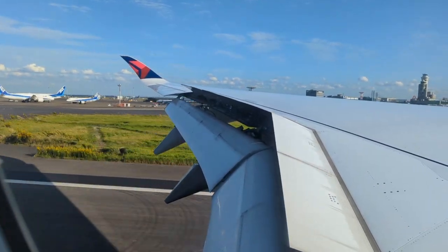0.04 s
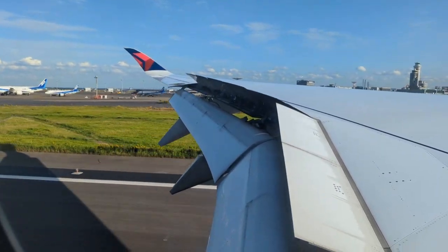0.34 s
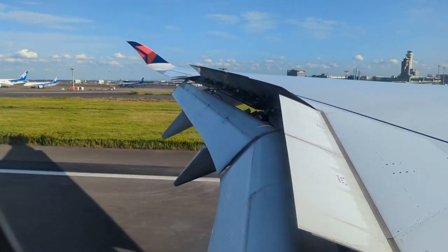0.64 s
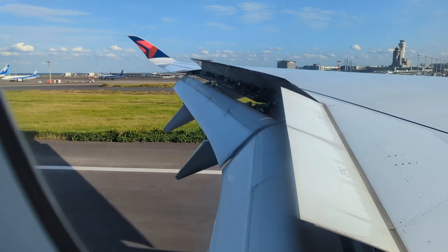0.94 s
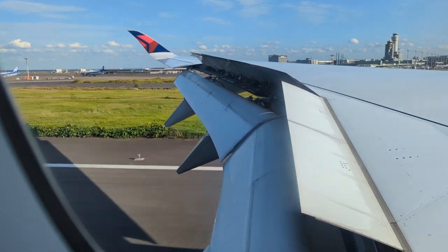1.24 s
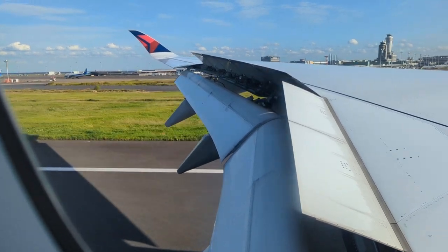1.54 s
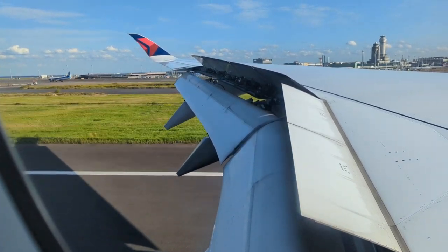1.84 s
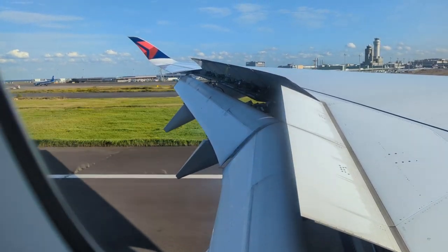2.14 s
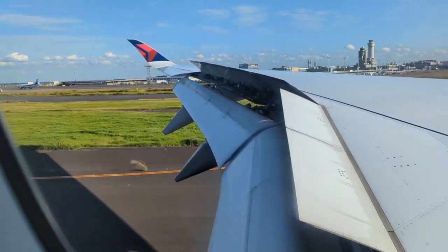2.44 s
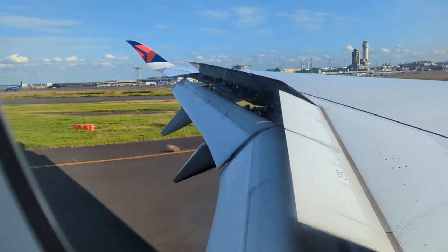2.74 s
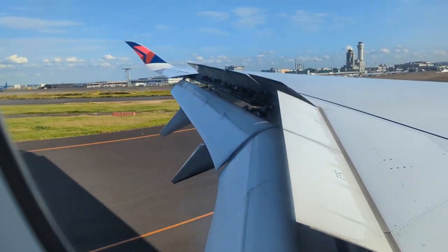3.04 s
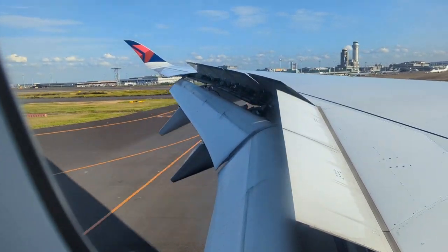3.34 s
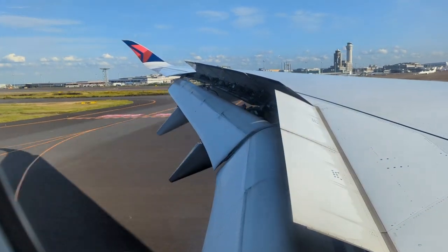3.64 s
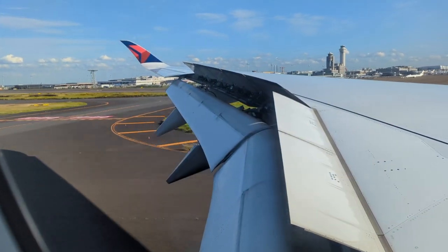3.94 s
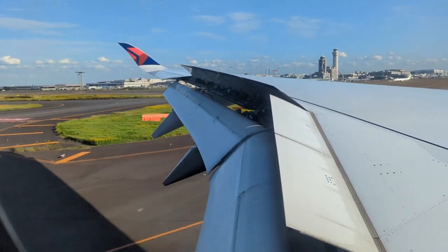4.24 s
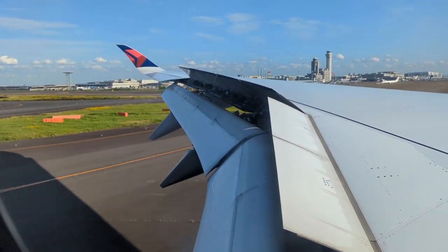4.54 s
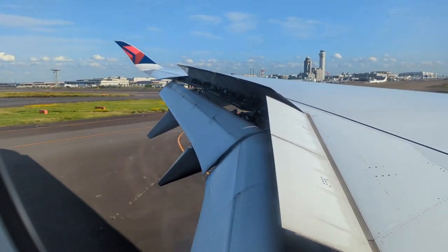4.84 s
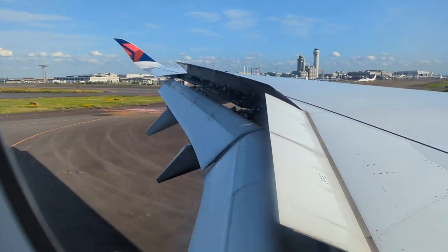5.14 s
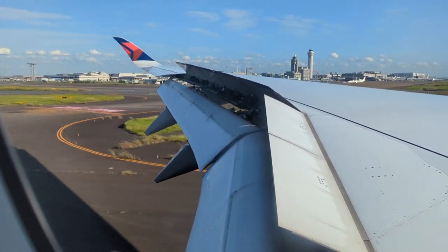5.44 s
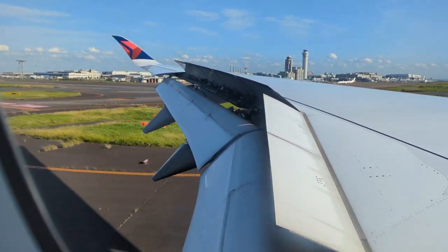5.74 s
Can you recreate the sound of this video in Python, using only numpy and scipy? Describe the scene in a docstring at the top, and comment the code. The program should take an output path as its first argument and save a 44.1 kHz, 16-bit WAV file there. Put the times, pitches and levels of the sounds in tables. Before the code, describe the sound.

An airliner rolls along after landing, heard inside the cabin as a loud, deep rumble and roar with rattling, knocking panels.

```python
"""Inside an airliner rolling out on a runway after landing, at a window over the wing.
From the start the wheels send a deep, surging rumble through the airframe, engines and air roar, and
the shaking rattles panels and ticks plastic fittings. From half a second on, pavement jolts bring
flurries, loose panels knock and rubbing plastic squeaks. The knocks crowd in past the middle, and the
roar swells to the end. Two microphone ports colour it all differently; a limiter holds the peaks."""
import sys
import numpy as np
from scipy import signal
from scipy.fft import rfft, irfft
from scipy.io import wavfile
from scipy.ndimage import uniform_filter1d, minimum_filter1d

SR = 44100
rng = np.random.default_rng(int(sys.argv[2]) if len(sys.argv) > 2 else 0)


def wav_record(signal):
    """Record a signal, one row per channel, as 16-bit PCM in the file named by sys.argv[1]."""
    frames = np.transpose(np.atleast_2d(signal))
    bounded = np.clip(frames, -1, 1)
    # unit amplitude maps onto the largest positive 16-bit level
    quanta = np.round(bounded * 32767).astype(np.int16)
    wavfile.write(sys.argv[1], SR, quanta)


N = 259308
TIME = np.arange(N) / SR
BINS = np.fft.rfftfreq(N, 1 / SR)


def amp(db):
    """Decibels to amplitude ratio."""
    return 10 ** (np.asarray(db) / 20)


def unit(x):
    """Normalisation to rms 1; a stereo pair by the mean of its channels."""
    return x / np.sqrt(np.mean(np.atleast_2d(x).mean(0) ** 2) + 1e-20)


def across(points, hz):
    """Interpolation of a table on a log-frequency axis."""
    f, value = np.transpose(points)
    return np.interp(np.log(hz + 1), np.log(f + 1), value)


def level(curve, column=1):
    """Amplitude envelope from one dB column; table levels are relative, ahead of the mixing gains."""
    rows = np.array(curve)
    return amp(np.interp(TIME, rows[:, 0], rows[:, column]))


def coloured(x, spectrum):
    """Spectral shaping, falling 12 dB per octave below the first point."""
    skirt = np.minimum(BINS / spectrum[0][0], 1) ** 2
    return irfft(rfft(x) * amp(across(spectrum, BINS)) * skirt, N)


def steadied(x, span_s):
    """Division by the running rms evens out slow changes and leaves the quick flutter."""
    window = signal.windows.hann(int(span_s * SR) + 3)
    weight = signal.fftconvolve(np.ones(N), window, "same")
    power = signal.fftconvolve((x ** 2).mean(0), window, "same") / weight
    return unit(x / np.sqrt(abs(power) + 1e-20))


def wander(low_hz, high_hz):
    """Band-limited pink noise: slow random motion between two rates."""
    shape = (BINS > low_hz) / np.sqrt(BINS + low_hz) / (1 + (BINS / high_hz) ** 2)
    return unit(irfft(rfft(rng.standard_normal(N)) * shape, N))


def add(mix, start_s, sound):
    """Superposition of a sound on the mix."""
    part = mix[:, max(round(start_s * SR), 0):][:, :sound.shape[1]]
    part += sound[:, :part.shape[1]]


# likeness of the cabin sound at the two ports: frequency_hz, correlation
COHERENCE = [(60, 0.99), (150, 0.99), (270, 0.97), (400, 0.88), (500, 0.71), (620, 0.44), (850, 0.16),
             (1200, -0.47), (1600, -0.34), (2100, -0.037)]
def cabin_noise(spectrum):
    """Diffuse-field coherence: two ports hear alike in the bass, unrelated in the treble."""
    left, independent = rfft(rng.standard_normal((2, N)))
    alike = np.clip(across(COHERENCE, BINS), -1, 1)
    right = alike * left + np.sqrt(1 - alike ** 2) * independent
    return coloured(irfft(np.array([left, right]), N), spectrum)


# spectra of the fuselage's throb and the floor's drumming: frequency_hz, level_db
THROB_SPECTRUM = [(15, -16), (25, -10), (34, -18.5), (44, -13.5), (56, -2.5), (68, 0.5), (78, -6.5),
                  (90, -23.5), (130, -33.5), (300, -96.5)]
DRUM_SPECTRUM = [(55, -49), (72, -18), (84, 0.5), (100, 0.5), (114, -0.5), (130, -7), (160, -14.5),
                 (300, -54), (1000, -78)]
# surges of the throb over uneven pavement: centre_s, length_s, lift_db
SURGES = [(0.097, 0.029, 5), (0.677, 0.15, 7.5), (0.99, 0.086, 8), (1.134, 0.032, 8.5), (1.666, 0.072, 5),
          (2.256, 0.047, 6.5), (2.664, 0.089, 4), (2.838, 0.096, 9), (3.175, .08, 6.5), (3.543, 0.16, 2.5),
          (4.03, 0.3, 4), (4.622, 0.17, 8), (4.99, .16, 3.5), (5.27, 0.086, 10), (5.587, 0.078, 5),
          (5.838, .1, 4)]
# drumming of the cabin floor: time_s, level_db
DRUM_LEVELS = [(0, -14.5), (1.15, -15.5), (1.43, -10.5), (1.65, -15), (2.4, -12.5), (3.1, -13.5),
               (3.4, -9.5), (3.8, -15), (4.3, -10.5), (4.85, -9.5), (5.45, -15), (5.88, -11)]
def wheels():
    """Structure-borne sound: rough pavement drives the lowest fuselage resonances and the floor."""
    surge_db = sum(db * np.exp(-2 * ((TIME - s) / length_s) ** 2) for s, length_s, db in SURGES)
    throb = amp(-15 + surge_db) * steadied(cabin_noise(THROB_SPECTRUM), span_s=0.34)
    drum = level(DRUM_LEVELS) * steadied(cabin_noise(DRUM_SPECTRUM), span_s=0.47)
    return throb + amp(-0.5) * drum


# spectra of the roar's two bands: frequency_hz, level_db
BOOM_SPECTRUM = [(80, -74), (125, -1.5), (145, 2.5), (185, -3), (215, -4), (238, -2), (262, -4.5),
                 (285, -17), (340, -14.5), (430, -33.5), (700, -64)]
RUSH_SPECTRUM = [(200, -30), (285, 4), (335, 2.5), (385, 1.5), (455, -3.5), (505, -2.5), (560, -7),
                 (800, -9.5), (1000, -13), (1250, -18), (2200, -23), (3600, -35.5), (4300, -34),
                 (5000, -44), (12000, -76)]
# swell of engines and air: time_s, boom_db, rush_db
ROAR_LEVELS = [(0, -19, -30), (1.6, -19.5, -30.5), (3.0, -16.5, -26), (3.7, -20, -27.5), (4.3, -14.5, -27),
               (4.6, -15.5, -24), (5.1, -11.5, -23.5), (5.88, -11, -24.5)]
def roar():
    """Transmission through the cabin wall: engines and air arrive as a boom and a gusty rush above it."""
    boom = steadied(cabin_noise(BOOM_SPECTRUM), span_s=0.23)
    gusts = amp(0.87 * wander(1.6, 33))
    rush = steadied(cabin_noise(RUSH_SPECTRUM) * gusts, span_s=0.3)
    return amp(-0.1) * level(ROAR_LEVELS, 1) * boom + amp(2.5) * level(ROAR_LEVELS, 2) * rush


def contact(hz, width_hz, ring_db, rise_s, decay_s, echo_db, size=4096):
    """Impact excitation: a short scrape rings one resonance, and seats and walls scatter it."""
    t, f = np.arange(size) / SR, np.fft.rfftfreq(size, 1 / SR)
    echo = amp(echo_db) * np.exp(-t / .018)
    envelope = (1 - np.exp(-t / rise_s)) ** 2 * (np.exp(-t / decay_s) + echo)
    scrape = rng.standard_normal((2, size)) * envelope
    resonance = 1 + amp(ring_db) / (1 + 2j * (f - hz) / width_hz)
    return unit(irfft(rfft(scrape) * resonance))


def rattle(shake, spectrum, band_hz, density, flutter_db, width_hz, ring_db, decay_s, parts=28):
    """A Poisson process: loose parts strike at random, more often the harder they are shaken."""
    out = np.zeros((2, N))
    chance = density / parts / SR * unit(shake) ** 0.65
    for hz in np.geomspace(*band_hz, parts):
        hits = (rng.random(N) < chance) * amp(2.5 * np.minimum(rng.exponential(1, N), 3))
        ring = contact(hz, width_hz, ring_db, rise_s=0.00035, decay_s=decay_s, echo_db=-19)
        out += signal.oaconvolve(hits[None], ring, axes=1)[:, :N]
    flutter = amp(flutter_db * wander(2.7, 45))
    return shake * flutter * steadied(coloured(out, spectrum), span_s=0.11)


# spectra of wall panels and plastic fittings: frequency_hz, level_db
PANEL_SPECTRUM = [(500, 4), (1000, 3), (1230, 0.5), (1380, -3), (1650, -1.5), (1880, -1.5), (2050, 0.5),
                  (2260, -3.5), (2400, -2), (2600, 1), (3100, -2.5), (3520, 3.5), (4150, 1), (4900, -11),
                  (6300, -13.5), (9000, -32)]
FITTING_SPECTRUM = [(2000, -0.5), (4000, 16), (5200, 2.5), (6200, 4), (6800, -2), (7400, 1), (8000, -5),
                    (8770, -0.5), (9700, -3), (11900, -2), (13800, -7), (14900, -3), (16000, -3.5)]
# steady shaking of the trim: time_s, panel_db, fitting_db
SHAKE_LEVELS = [(0, -46, -55.5), (.5, -40, -53.5), (.77, -46, -63), (1.0, -42, -57), (1.42, -45, -64.5),
                (1.55, -41, -55.5), (1.8, -43, -61.5), (2.35, -38, -56.5), (2.7, -35, -48), (3.1, -35, -50),
                (3.6, -35.5, -49.5), (3.95, -40.5, -55.5), (4.45, -35, -51.5), (4.7, -34, -50),
                (5.22, -34.5, -55), (5.4, -37, -52.5), (5.88, -34.5, -54)]
def trim(jolt_db):
    """Forced vibration: the same shaking rattles panels and, higher in pitch, small plastic fittings."""
    panel_shake = level(SHAKE_LEVELS, 1) * amp(jolt_db)
    fitting_shake = level(SHAKE_LEVELS, 2) * amp(1.16 * jolt_db)  # light parts answer a jolt more
    panels = rattle(panel_shake, PANEL_SPECTRUM, band_hz=(1113, 3950), density=1300,
                    flutter_db=1.35, width_hz=150, ring_db=7.5, decay_s=0.002)
    fittings = rattle(fitting_shake, FITTING_SPECTRUM, band_hz=(4420, 14670), density=760,
                      flutter_db=1.2, width_hz=420, ring_db=10.5, decay_s=0.0025)
    return amp(-2.16) * panels + amp(5.0) * fittings


def blows(rows, spectrum, width_hz, rise_s, base_decay_s, hardening, size=4096):
    """Contact stiffening and damping: a harder blow is brighter, a freer ring lasts longer."""
    out, f = np.zeros((2, N)), np.fft.rfftfreq(2 * size, 1 / SR)
    usual_db = np.mean([row[1] for row in rows])
    for time_s, peak_db, hz, ring_db in rows:
        decay_s = base_decay_s * 2 ** (ring_db / 29)  # doubles for a ring 29 dB stronger
        ring = contact(hz, width_hz, ring_db, rise_s, decay_s, echo_db=-22)
        tilt_db = hardening * max(peak_db - usual_db, 0) * np.log2(1 + f / hz)
        blow = irfft(rfft(ring, 2 * size) * amp(across(spectrum, f) + tilt_db))[:, :size]
        peak = np.sqrt(2 * uniform_filter1d((blow ** 2).mean(0), size=200).max())
        add(out, time_s - rise_s, amp(peak_db) * blow / peak)
    return out


# single clicks of the fittings: time_s, peak_db, pitch_hz
CLICKS = [(0.037, -32, 11100), (0.105, -32, 12000), (0.198, -28, 12500), (0.205, -24.5, 12400),
          (0.3187, -31.5, 7280), (0.539, -31, 7050), (0.6719, -28, 7510), (.835, -33, 13800),
          (1.055, -31, 7140), (1.359, -33.5, 6870), (1.461, -33.5, 7050), (1.509, -33, 6930),
          (1.6222, -34, 7210), (1.673, -35, 7090), (1.821, -32, 6860), (2.0487, -30.5, 6860),
          (2.299, -25, 8900), (2.569, -27, 6880), (2.6274, -31, 12000), (2.749, -27, 14700),
          (3.193, -22, 12000), (3.266, -26, 8990), (3.522, -36, 5800), (3.598, -31, 5800),
          (3.704, -25.5, 10700), (3.9848, -32, 6810), (4.016, -31, 11900), (4.035, -24, 11900),
          (4.103, -28, 7130), (4.203, -28.5, 7250), (4.261, -24, 9000), (4.569, -26, 7040),
          (4.874, -26.5, 14500), (5.476, -26, 9000), (5.822, -26, 8930)]
def clicks(ring_db=-0.5):
    """Impacts of hard plastic fittings excite high, quickly damped resonances."""
    rows = [(*row, ring_db) for row in CLICKS]
    return blows(rows, FITTING_SPECTRUM, width_hz=500, rise_s=0.001205, base_decay_s=.0038, hardening=0.7)


# jolts from the pavement: start_s, lift_db, hold_s
JOLTS = [(.535, 4, 0.069), (0.905, 5, .06), (1.963, 9.5, 0.0091), (2.394, 3.5, 0.018), (2.76, -1.5, .025),
         (2.923, 4.5, .05), (3.164, 6, .15), (3.243, 1, 0.11), (3.515, 5.5, .055), (4.252, 5, 0.038),
         (4.405, 3.5, 0.044), (4.652, 2, 0.07), (5.295, 4.5, 0.038)]
def jolts(attack_s=.014, release_s=.035):
    """Transient excitation: each jolt shifts the shaking, in dB, then holds and decays exponentially."""
    lift_db = np.zeros(N)
    for start_s, db, hold_s in JOLTS:
        t = TIME - start_s
        lift_db += db * np.clip(t / attack_s, 0, 1) * np.exp(-np.maximum(t - hold_s, 0) / release_s)
    return lift_db


# single knocks of loose panels: time_s, peak_db, pitch_hz, ring_db
KNOCKS = [(0.536, -27, 2620, 15), (0.6729, -26.5, 2200, 15), (1.971, -27, 1880, 22), (2.266, -23, 2000, 8),
          (2.579, -21, 2520, 3), (2.627, -18.5, 2300, 9), (2.663, -21.5, 3880, -2), (2.703, -21, 3600, 3),
          (2.773, -16, 3420, 5), (2.9088, -13, 3400, 3), (3.1882, -16, 3520, 12), (3.275, -17, 4000, 19),
          (3.5204, -19, 3350, 11), (3.5594, -18, 3700, 12), (3.597, -15, 3450, 7), (3.633, -17.5, 3580, 5),
          (3.655, -23, 3700, 2), (3.7, -21, 2100, 15), (3.731, -18, 1650, 22), (3.761, -20, 3530, 1),
          (3.7804, -17.5, 3540, 6), (4.0183, -19.5, 1650, 21), (4.108, -18, 2630, 4),
          (4.2744, -16, 1650, 24), (4.4353, -17, 3400, 9), (4.6636, -18, 3700, 7), (4.745, -17.5, 2170, 16),
          (5.3174, -21, 3620, 4), (5.428, -18.5, 1480, 9), (5.5623, -21, 1800, 13)]
def knocks():
    """Damped free vibration: a loose panel strikes and rings at its own pitch."""
    return blows(KNOCKS, PANEL_SPECTRUM, width_hz=110, rise_s=0.001158, base_decay_s=.0063, hardening=0.58)


# plastic rubbing on plastic: start_s, level_db, pitch_hz, length_s
SQUEAKS = [(0.892, -30.5, 3720, .024), (1.201, -36, 3590, 0.033), (2.403, -35, 1850, 0.028),
           (5.548, -33, 3500, .035)]
def squeaks(width_hz=140, size=4096):
    """Stick-slip friction: uneven slips keep one narrow resonance ringing in a brief swell."""
    out, t, f = np.zeros((2, N)), np.arange(size) / SR, np.fft.rfftfreq(size, 1 / SR)
    for start_s, db, hz, length_s in SQUEAKS:
        slips = irfft(rfft(rng.standard_normal((2, size))) / (1 + 1j * (f - hz) / width_hz) ** 2)
        tone = np.cos(np.angle(signal.hilbert(slips)))  # constant amplitude, wavering pitch
        swell = np.sin(np.pi * np.minimum(t / length_s, 1) ** 1.8)
        add(out, start_s, amp(db) * tone * swell)
    return out


# resonances of the trim: pitch_hz, width_hz, lift_db
TRIM_MODES = [(1860, 123, 4), (2240, 100, 5), (2690, 130, 3.5), (3530, 51, -0.5), (3710, 130, 0.5),
              (8870, 220, 3.5), (11800, 300, 0.5), (14924, 250, 1)]
def trim_resonance(x):
    """Modal superposition: everything that rattles passes through the same resonances."""
    body = 1 + sum((amp(db) - 1) / (1 + 2j * (BINS - hz) / width_hz) for hz, width_hz, db in TRIM_MODES)
    return irfft(rfft(x) * body, N)


def scene():
    """Superposition at the seat: rumble, roar and shaking trim, eased in and out over 3 ms."""
    rumble_and_roar = wheels() + roar()
    rattling = trim_resonance(trim(jolts()) + amp(-4.5) * clicks() + amp(-5.5) * knocks())
    edge_s = np.minimum(TIME, TIME[::-1])
    ease = np.sin(np.pi / 2 * np.minimum(edge_s / .003, 1)) ** 2
    return ease * (rumble_and_roar + rattling + amp(3.0) * squeaks())


# the right port rings near 4 kHz and has a null near 8 kHz: frequency_hz, left_minus_right_db
PORT_BALANCE = [(120, 1.55), (460, 2), (700, -1), (1050, -3), (2200, -7.5), (2900, -5), (3700, -13.5),
                (4400, -14), (5200, -5.5), (6400, -3.5), (7200, 13.5), (7900, 38), (8700, 11), (11000, 0.5)]
def record(dry, low_cut_hz=36, high_cut_hz=15800, ceiling=.95):
    """Filtering and limiting: low cut, port colours, a fast look-ahead peak limiter, then a high cut."""
    ratio = amp(across(PORT_BALANCE, BINS))
    ports = np.array([ratio, np.ones_like(ratio)]) * np.sqrt(2 / (1 + ratio ** 2))
    low_cut = 1 / np.sqrt(1 + (low_cut_hz / (BINS + 1)) ** 8)
    ported = irfft(rfft(dry) * low_cut * ports, N)
    headroom = np.minimum(ceiling / (abs(ported).max(0) + 1e-9), 1)
    held = minimum_filter1d(headroom, size=600)
    gain = uniform_filter1d(uniform_filter1d(held, size=300), size=300)
    high_cut = signal.firwin(511, high_cut_hz, window=("kaiser", 9), fs=SR)
    return signal.oaconvolve(ported * gain, high_cut[None], "same")


dry = scene()
out = record(dry)
wav_record(out)
```